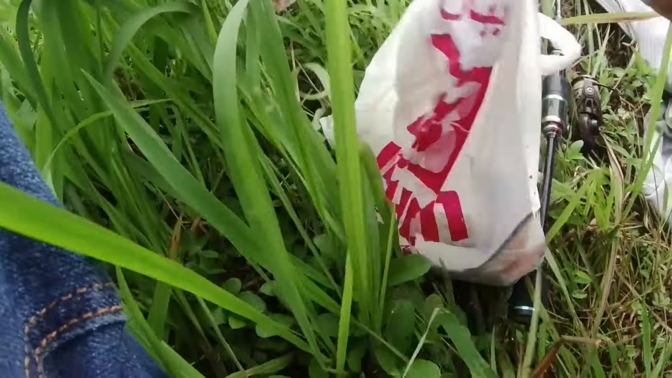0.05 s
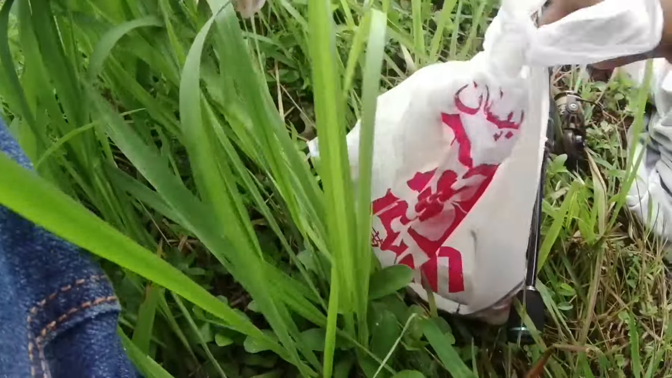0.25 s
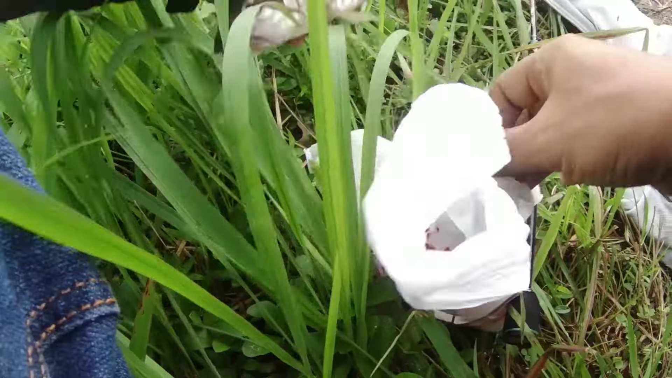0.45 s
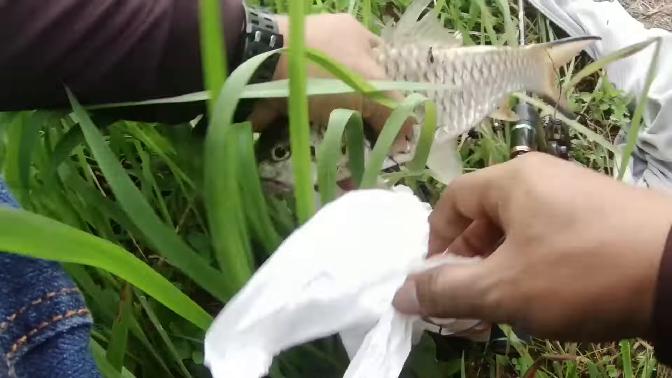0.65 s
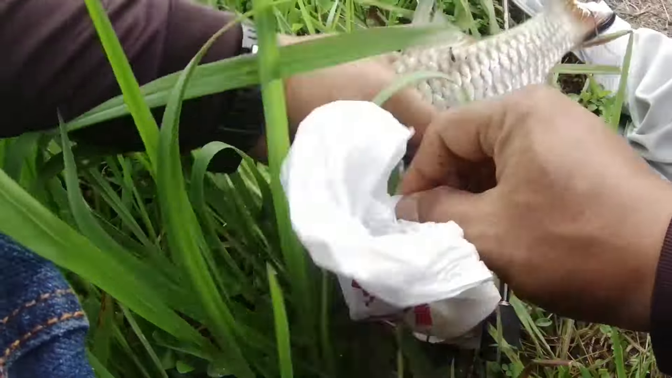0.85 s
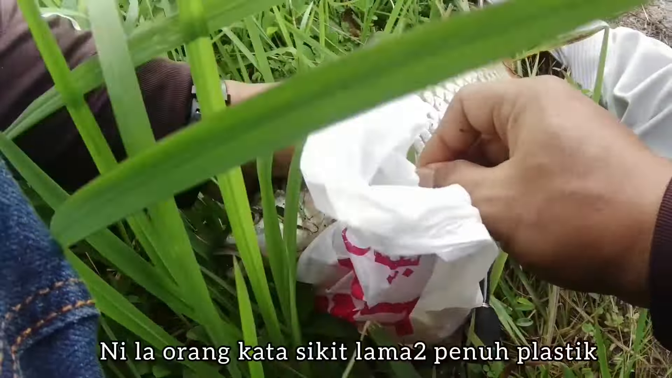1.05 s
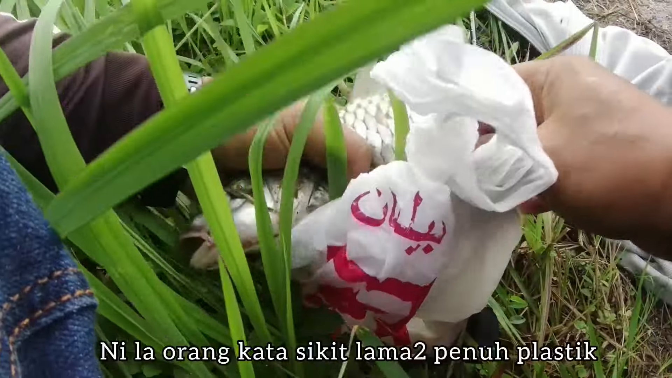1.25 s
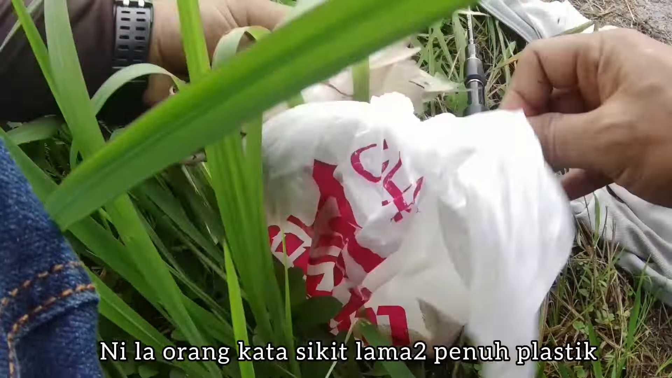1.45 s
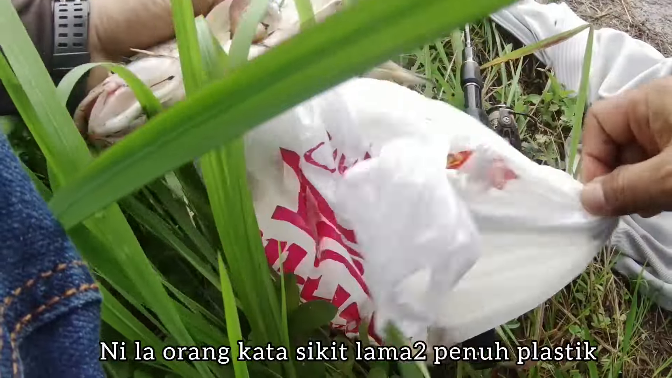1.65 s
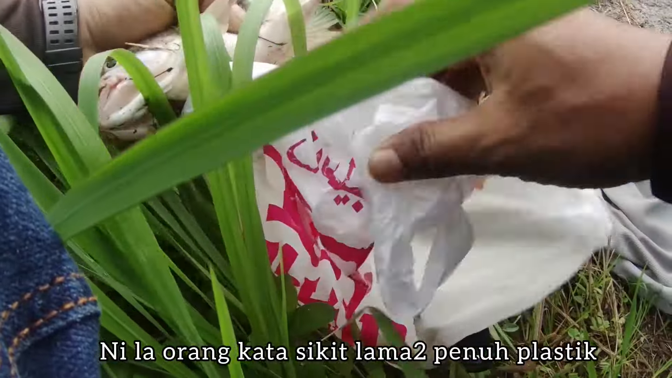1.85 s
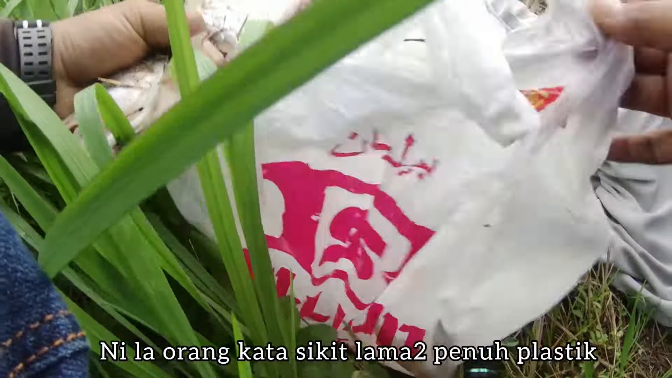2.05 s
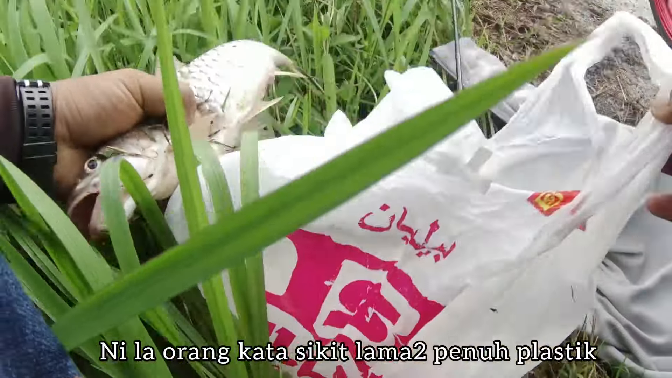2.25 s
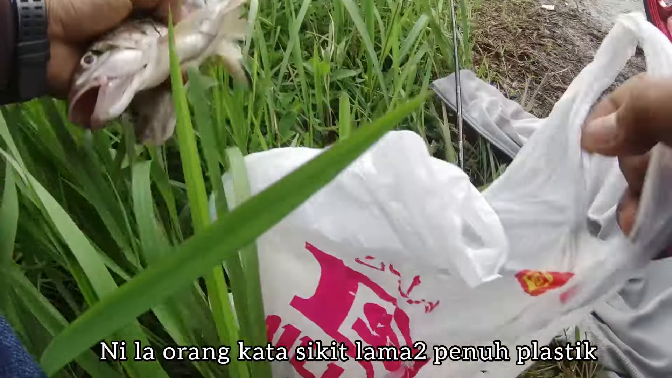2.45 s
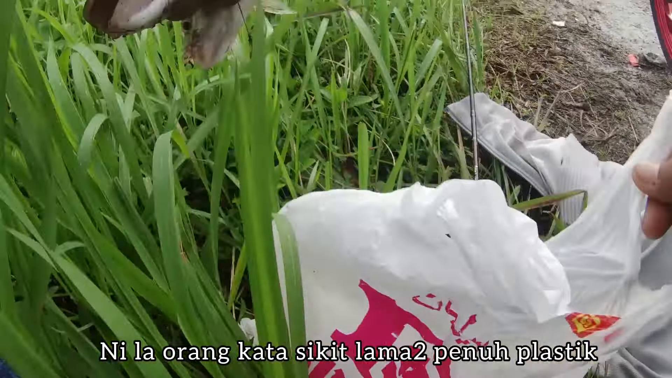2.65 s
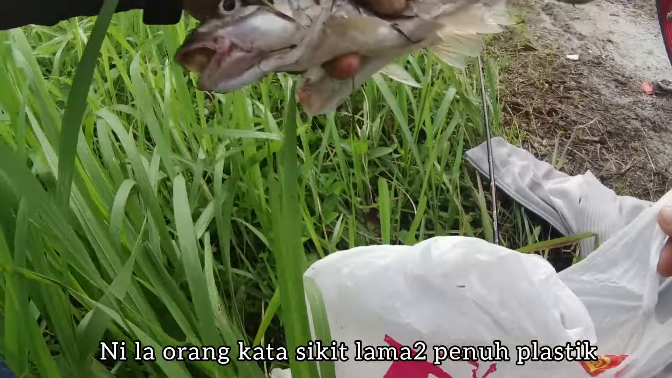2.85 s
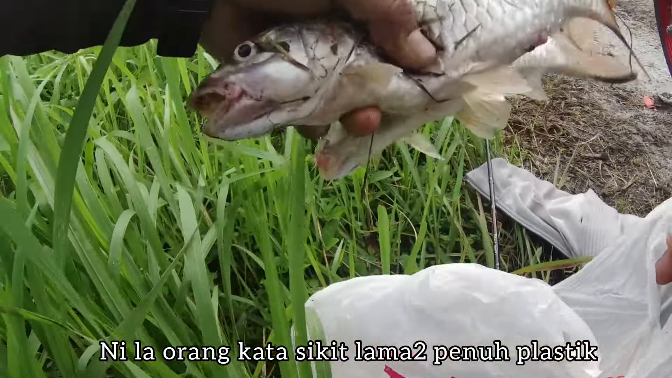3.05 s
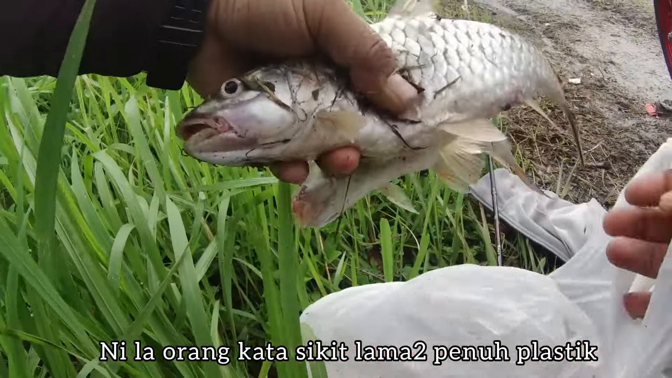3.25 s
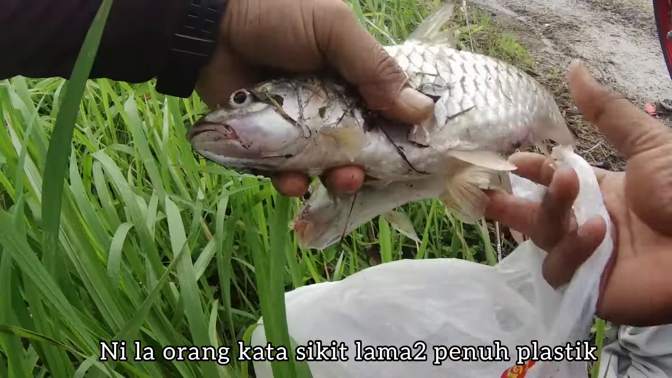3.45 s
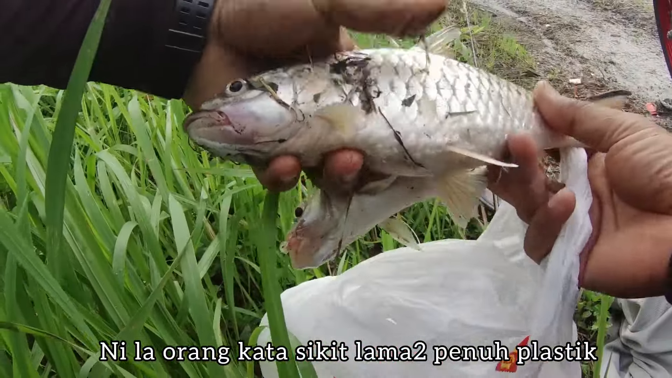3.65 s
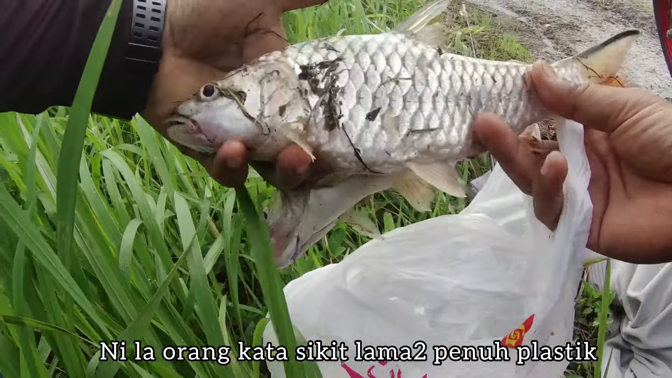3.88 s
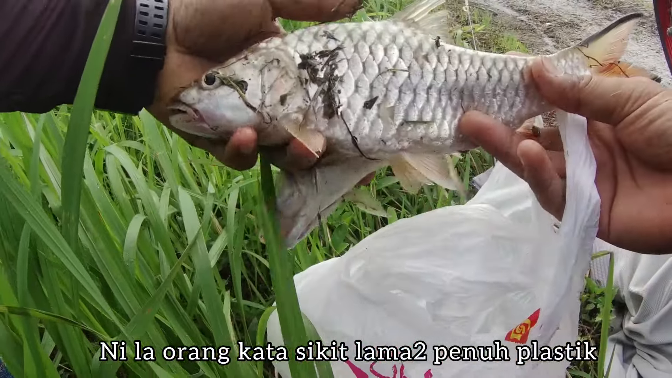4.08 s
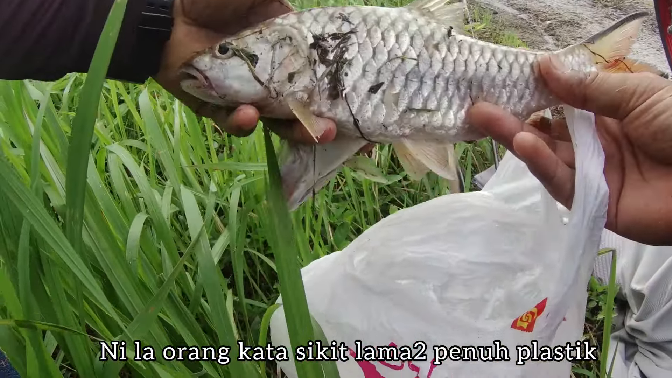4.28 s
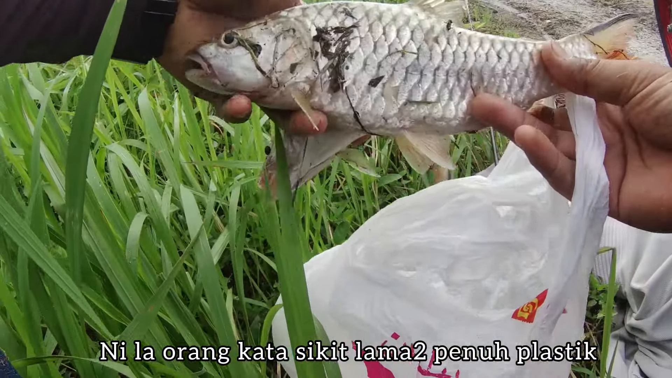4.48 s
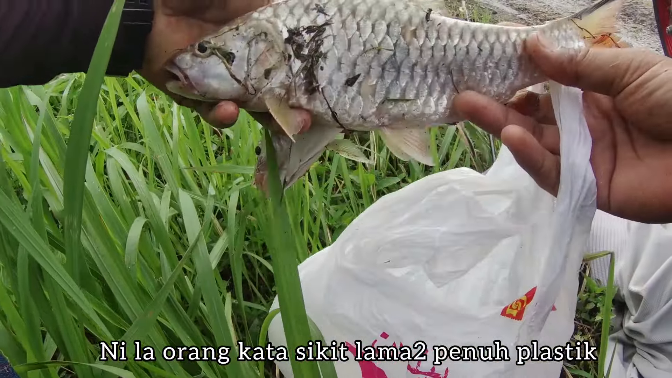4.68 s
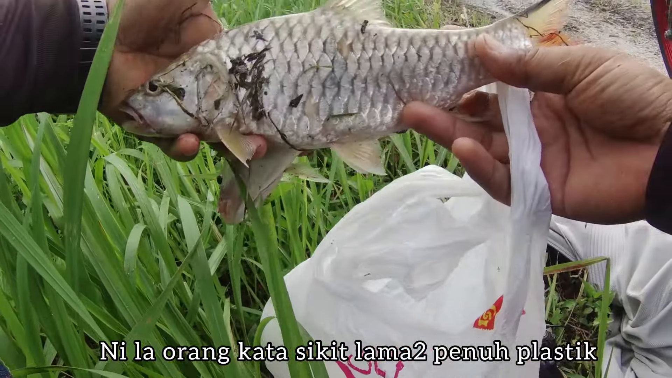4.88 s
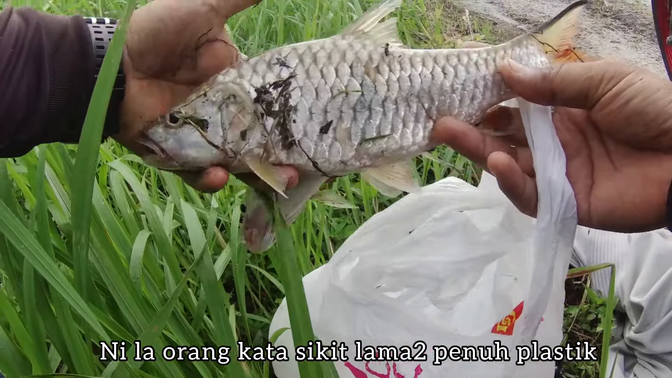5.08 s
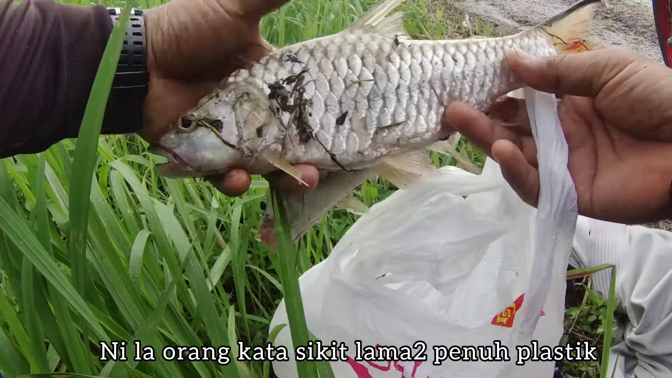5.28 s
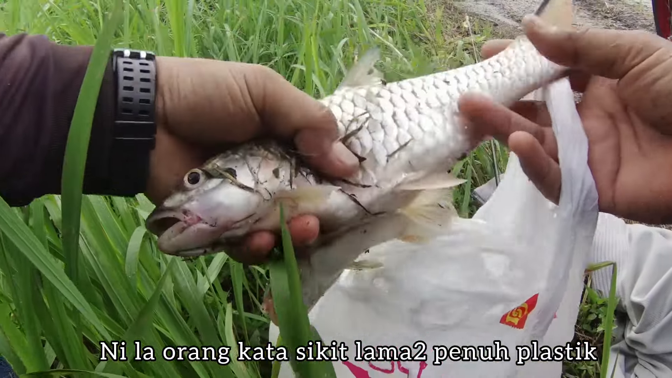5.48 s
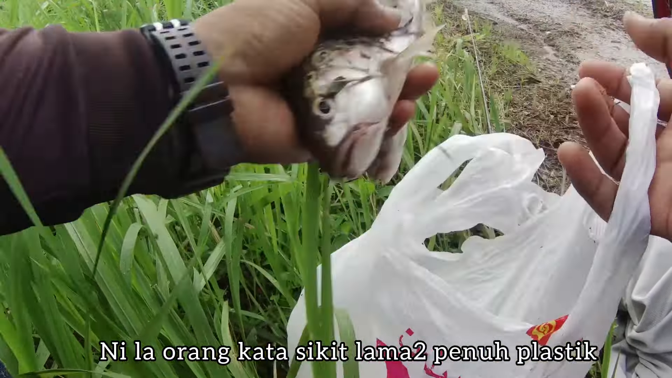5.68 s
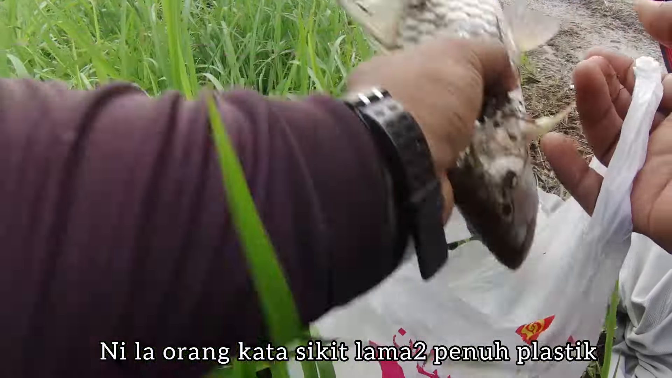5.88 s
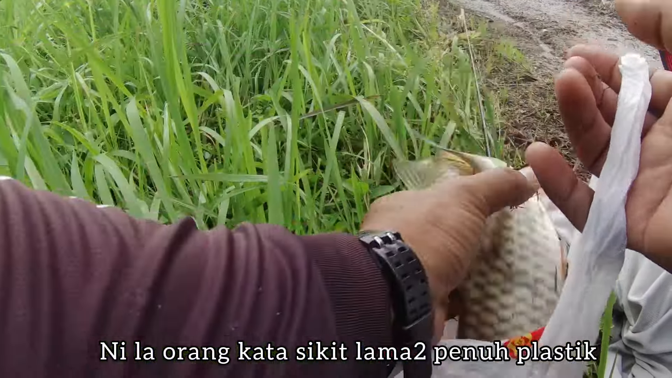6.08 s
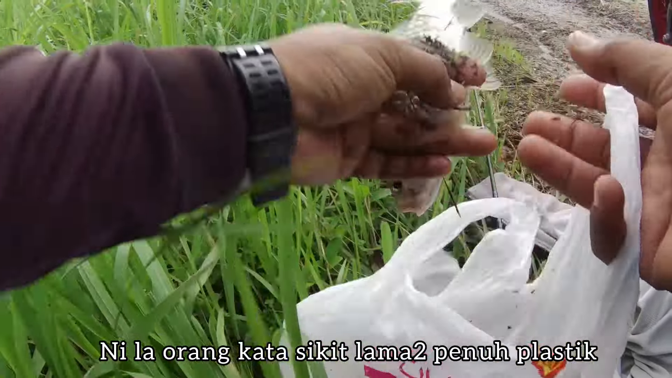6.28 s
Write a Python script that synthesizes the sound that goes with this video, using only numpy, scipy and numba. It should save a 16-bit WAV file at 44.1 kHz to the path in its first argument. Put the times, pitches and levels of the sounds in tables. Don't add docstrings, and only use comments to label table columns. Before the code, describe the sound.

Close, bright plastic bag rustling for three seconds, then small crinkles and ticks over swelling tyre roar, a sinking hum and tiny dry squeaks.

```python
import sys
import numpy as np
from scipy import signal
from scipy.fft import rfft, irfft, next_fast_len
from scipy.io import wavfile
from scipy.ndimage import uniform_filter1d
from numba import njit

SR = 44100
rng = np.random.default_rng(int(sys.argv[2]) if len(sys.argv) > 2 else 0)


def store_pcm(level_fs):
    pcm = np.round(np.clip(level_fs, -1, 1) * 32767).astype(np.int16)
    wavfile.write(sys.argv[1], SR, np.atleast_2d(pcm).T)


def to_linear_factor(level_db):
    exponent = np.asarray(level_db, float) / 20
    return 10 ** exponent


N = 279108
SIZE = next_fast_len(N)


def curves(table):
    s, *columns = np.transpose(table)
    return [np.interp(np.arange(N) / SR, s, c) for c in columns]


def fade_ends(table, fade):
    t = np.arange(N) / SR
    since_start, until_end = t - table[0][0], table[-1][0] - t
    return np.clip(np.minimum(since_start, until_end) / fade + 1, 0, 1)


def unit(x):
    return x / np.sqrt(np.mean(x ** 2))


def colour(x, spectrum):
    hz, db = np.transpose(spectrum)
    f = np.arange(SIZE // 2 + 1) * SR / SIZE + 1
    gain = to_linear_factor(np.interp(np.log(f), np.log(hz), db))
    return irfft(rfft(x, SIZE) * gain, SIZE)[:N]


@njit
def resonance(x, hz, width):
    y, b, l = np.empty(len(x)), 0., 0.
    for i in range(len(x)):
        g, k = np.tan(np.pi * hz[i] / SR), width / hz[i]
        v = (b + g * (x[i] - l)) / (1 + g * (g + k))
        b, l, y[i] = 2 * v - b, l + 2 * g * v, k * v
    return y


def band(hz, width, order=2):
    x = rng.standard_normal(N)
    centre = np.clip(hz + np.zeros(N), 20, .45 * SR)
    for _ in range(order):
        x = resonance(x, centre, 1. * width)
    return unit(x)


def walk(rate):
    hold = max(int(SR / rate), 101)
    steps = np.repeat(rng.standard_normal(N // 100), hold)[:N]
    return 1.291 * uniform_filter1d(uniform_filter1d(steps, hold), hold)


def clicks(rate, spread_db):
    chance, size, sign = rng.random(N), rng.exponential(size=N), rng.standard_normal(N)
    height = to_linear_factor(spread_db * np.minimum(size, 4.2)) * np.sign(sign)
    return unit((chance < rate / SR) * height / np.sqrt(rate))


def ring(x, t60):
    t = np.arange(512) / SR
    tail = rng.standard_normal(len(t)) * np.exp(-np.log(1000) * t / t60)
    tail[0] += 2.5
    smear = rfft(tail, SIZE)
    return rfft(x, SIZE) * smear / np.abs(smear)


def window(hz, octaves):
    place = np.log2((np.arange(SIZE // 2 + 1) * SR / SIZE + 1) / hz) / octaves
    return np.cos(np.pi / 2 * np.clip(place, -1, 1))


def grip():
    # hardest pull t/s, rustle level/dB, 20 dB swell/s, 20 dB fade/s, fine wrinkles/dB
    grips = [(0.085, -29, .16, .13, -1), (0.2, -40, .15, .2, 1), (0.33, -41, .15, .14, 1),
             (0.42, -45, .1, .06, 1), (0.511, -41, .07, .1, 3), (0.62, -28, 0.145, .12, -3),
             (0.78, -32.5, .18, .14, 1), (0.89, -42, .1, .15, 3), (0.985, -44, .12, .05, -2),
             (1.143, -38.5, 0.0615, .16, -1), (1.33, -46, .1, .2, 2), (1.46, -39.5, .2, .16, -1),
             (1.68, -41.5, .3, .27, 2), (1.94, -39, .13, .3, -1), (2.221, -34, .35, .25, 1),
             (2.33, -35, .15, .15, 1), (2.429, -27, .13, .1, -1), (2.51, -41, .08, .08, 2),
             (2.64, -30, .045, .07, -1), (2.73, -29, .08, .22, 1), (2.85, -28, 0.1733, .12, -2),
             (3.11, -36.5, 0.19, .17, 0.1), (3.29, -42, .2, .07, -3)]
    # hardest t/s, rustle level/dB, swell/s, fade/s, fine wrinkles/dB
    nudges = [(3.42, -53.5, .15, .3, -5), (3.67, -61, .2, .2, -2), (3.75, -45, .04, .08, -16),
              (3.83, -55, .08, .14, -2), (3.93, -47, .13, .13, -5), (4.05, -51, .025, .15, 1),
              (4.13, -52, .1, .12, 0.1), (4.21, -49, .12, .1, -1), (4.31, -58, .12, .14, -4),
              (4.52, -61, .12, .2, -2), (4.63, -60, .15, .15, -1), (4.725, -52, .06, .05, -3),
              (4.95, -66, .15, .15, -2), (5.08, -60.5, .15, .07, -3), (5.33, -52.5, .12, .2, -1),
              (5.48, -47, .25, .16, -1), (5.56, -53, .1, .06, -3), (5.72, -66, .15, .15, 2),
              (6.14, -57, .1, .1, -1), (6.22, -48, .1, .13, -1), (6.33, -50, .11, .1, 3)]
    t = np.arange(N) / SR
    power, fine = to_linear_factor(-72) ** 2, 0
    for s, db, swell, fade, fine_db in grips + nudges:
        away = np.where(t < s, (s - t) / swell, (t - s) / fade)
        pull = to_linear_factor(db - 20 * np.minimum(away, 4) ** 1.27) ** 2
        power = power + pull
        fine = fine + pull * fine_db
    return 10 * np.log10(power), fine / power


def bag():
    # t/s, large folds level/dB, middling creases level/dB
    folds = [(0.0, -4, -1), (0.3, -3, 0.1), (0.5, -1, 0.1), (0.8, 5, 3), (1.0, -1, 0.1), (1.2, -1, 1),
             (1.65, 4, 2), (1.95, 0.1, -2), (2.35, 3, 1), (2.8, 0.1, 1), (3.25, 6, 3), (3.6, 2, -1),
             (3.93, -1, -7), (4.06, 2, 3), (4.2, -7, -4), (5.15, -6, -3), (5.5, -9, 0.1), (6.33, -10, -6)]
    # f/Hz, level/dB
    film_tone = [(760, -61), (1300, -20.5), (1540, -18.5), (1970, -15.5), (2750, -8.5), (3790, -8.5),
                 (5500, -7.5), (6500, -5), (8600, -4), (11500, -4), (13200, -4.5), (15600, -12.5)]
    rustle_db, top_db = grip()
    large_db, middling_db = curves(folds)
    harder_db = rustle_db + 45
    rate = 2500 * to_linear_factor(.9 * (rustle_db + 39)) + 90
    wide = ring(clicks(rate, spread_db=2.0), t60=0.00246)
    flurry_db = 0.905 * walk(45) + 1.028 * walk(150)
    low_db = large_db - .3 * harder_db
    middle_db = middling_db - .2 * harder_db
    out = 0
    for hz in 1300 * 2 ** np.arange(0, 4.1, .4):
        own = ring(clicks(rate, spread_db=0.5) + 0.446 * rng.standard_normal(N), t60=0.00768)
        shape = window(hz, 2 / 5)
        crackle = irfft(shape ** 2 * wide + 1.236 * shape * own, SIZE)[:N]
        tilt = np.clip(1.53 * np.log2(5200 / hz), 0, 1) * low_db
        tilt = tilt + np.clip(1.2 - 1.5 * np.abs(np.log2(hz / 5700)), 0, 1) * middle_db
        tilt = tilt + np.clip(2 * np.log2(hz / 9500), 0, 1) * top_db
        tilt = tilt + np.clip(np.log2(2900 / hz), 0, .8) * 0.404 * (rustle_db + 32)
        out = out + to_linear_factor(tilt + 1.31 * walk(35) + 1.163 * walk(16)) * crackle
    film = colour(out, film_tone)
    bright_hz = np.clip(10100 * (1 + 0.026 * walk(14)), 5000, 15000)
    film = film + 1.008 * resonance(film, bright_hz, 2284.0)
    return unit(film) * to_linear_factor(rustle_db + flurry_db + 1.0)


def roar():
    # t/s, roar level/dB
    passes = [
        [(0.0, -55), (0.25, -57), (0.44, -66), (0.63, -53), (0.81, -56), (0.95, -68), (1.45, -62), (2.4, -64),
         (2.5, -85)],
        [(0.25, -66), (0.6, -53), (1.0, -57), (1.75, -57), (2.35, -48.5), (2.94, -43), (3.3, -38.5),
         (3.6, -41.5), (3.72, -76)],
        [(3.15, -75), (3.33, -49), (3.6, -44), (3.76, -43), (4.0, -52), (4.11, -61), (4.65, -68), (5.4, -70),
         (5.6, -85)],
        [(3.75, -85), (4.0, -55), (4.2, -59), (4.7, -68), (5.43, -61), (5.76, -55), (5.97, -52), (6.15, -45),
         (6.33, -43)],
    ]
    # low level/dB, middle level/dB, upper level/dB, engine thrum level/dB
    tyres = [
        (-19, -10, -0.5, -24),
        (-5, -1, -35, -28),
        (-1.5, -10, -1, -23),
        (-4, -0.5, -8, -41),
    ]
    power = 0
    for one_pass, tyre in zip(passes, tyres):
        power = power + to_linear_factor(curves(one_pass)[0] + np.array(tyre)[:, None]) ** 2
    return 10 * np.log10(power)


def road():
    # f/Hz, level/dB
    rumble_tone = [(88, -62.5), (150, -30.5), (268, -11.5), (333, -7.5), (383, 0), (415, 0), (507, -2),
                   (570, -6), (740, -24), (1250, -120)]
    # t/s, middle f/Hz, upper f/Hz
    humps = [(0.0, 790, 1080), (0.25, 720, 1200), (0.45, 640, 1070), (0.65, 670, 1030), (1.45, 700, 1120),
             (2.2, 755, 1040), (2.9, 735, 990), (3.33, 630, 990), (3.62, 640, 1000), (3.75, 710, 1085),
             (4.05, 800, 1120), (4.65, 745, 1070), (5.43, 720, 1000), (5.76, 680, 1100), (5.97, 670, 930),
             (6.33, 690, 1020)]
    low_db, middle_db, upper_db, _ = roar()
    middle_hz, upper_hz = curves(humps)
    swell_db = .7 * walk(14)
    low = unit(colour(rng.standard_normal(N), rumble_tone)) * to_linear_factor(low_db + 1.74 * walk(15))
    middle = band(middle_hz, 340, order=4) * to_linear_factor(middle_db + 1.6 * walk(15))
    upper = band(upper_hz, 540, order=4) * to_linear_factor(upper_db + 0.82 * walk(21.004))
    return (low + middle + upper) * to_linear_factor(swell_db)


def traffic():
    # t/s, tyre hiss level/dB
    far_hiss = [(0.0, -59.5), (0.3, -70), (0.5, -82), (0.7, -66), (0.9, -78), (1.46, -80), (1.75, -72),
                (2.42, -60), (2.55, -66), (3.0, -63), (3.13, -53), (3.28, -54), (3.45, -64), (3.74, -65),
                (3.98, -61), (4.1, -67), (5.9, -69), (6.33, -74)]
    # f/Hz, rms level/dB
    pump = [(75.4, -90)]
    engine_db, hiss_db = roar()[-1], curves(far_hiss)[0]
    t = np.arange(N) / SR
    hum = sum(np.sqrt(2) * to_linear_factor(db) * np.sin(2 * np.pi * hz * t) for hz, db in pump)
    hiss = band(1640, 855, order=3) + 0.57 * band(2232, 815, order=3)
    thrum = band(171.8, 273) * np.hypot(to_linear_factor(engine_db), to_linear_factor(-85))
    return thrum + hiss * to_linear_factor(hiss_db + 0.55 * walk(10)) + hum


def field():
    # f/Hz, level/dB
    field_tone = [(15, -60), (25, -27.5), (148, 0), (744, 11), (1310, -45), (1760, -61.5), (2640, 2.5),
                  (3270, 0.5), (7140, -4.5), (10700, -5.5), (15600, -75.5)]
    return unit(colour(rng.standard_normal(N), field_tone)) * to_linear_factor(-69 + 0.22 * walk(2.5))


def snaps():
    # t/s, peak level/dB, centre f/Hz
    creases = [(3.3123, -37.5, 9310), (3.3622, -31.5, 9680), (3.5842, -41, 10300), (3.678, -39, 7210),
               (3.7347, -30, 10090), (3.8103, -36, 9400), (3.9199, -34, 9480), (3.9865, -34, 9090),
               (4.0474, -28, 9400), (4.106, -29.5, 9530), (4.1337, -29, 10100), (4.1549, -36.5, 8960),
               (4.1986, -37.5, 11500), (4.3255, -35, 10780), (4.503, -38, 11200), (4.5305, -36.5, 8760),
               (4.5679, -35, 11800), (4.647, -38, 11100), (4.929, -40, 7700), (4.993, -47, 10100),
               (5.038, -35, 7600), (5.0728, -44, 6510), (5.3123, -34.5, 7950), (5.362, -33, 10000),
               (5.4056, -31, 11000), (5.4474, -33, 9340), (6.1275, -41.5, 10500), (6.2063, -28, 10400),
               (6.222, -23.5, 10430), (6.283, -33.5, 10700)]
    out, t = np.zeros(N), np.arange(256) / SR
    grits = rng.standard_normal((len(creases), len(t)))
    shape = (t / .0004) * np.exp(-t / 0.00059)
    for (s, db, hz), grit in zip(creases, grits):
        centre = hz + 0 * t
        tick = resonance(resonance(grit, centre, 7700.0), centre, 7700.0) * shape
        i = int(s * SR)
        out[i:i + len(t)] += (to_linear_factor(db - 5.0) * tick / np.abs(tick).max())[:N - i]
    return out


def whine():
    # t/s, pitch f/Hz, level/dB
    tread = [
        (3.42, 389.1, -45.5),
        (3.492, 391.1, -56.5),
        (3.512, 405, -40),
        (3.558, 379.3, -44),
        (3.692, 374.9, -34.5),
        (3.772, 370.8, -45),
        (3.856, 358.5, -43.5),
        (4.3, 351.9, -75),
    ]
    hz, db = curves(tread)
    phase = 2 * np.pi * np.cumsum(hz * (1 + 0.00635 * walk(24.63))) / SR
    return np.sqrt(2) * np.sin(phase) * to_linear_factor(db + 0.97 * walk(29.94)) * fade_ends(tread, fade=0.084)


def squeaks():
    # start t/s, length/s, pitch f/Hz, level/dB, octave below level/dB
    joint = [
        (3.7, .04, 4140, -58, -70),
        (3.735, .04, 4200, -52, -64),
        (4.155, .03, 3910, -60, -63.5),
        (4.18, .025, 3860, -53, -50),
        (4.208, .065, 3920, -45, -54),
        (4.272, .095, 3943, -58, -74),
        (4.85, .035, 3817, -54, -80.5),
        (4.885, .075, 3810, -62, -83.5),
    ]
    out = 0
    for s, length, hz, db, below_db in joint:
        shape = [(s, -10), (s + .35 * length, 0), (s + length, -15)]  # (s, dB)
        phase = 2 * np.pi * np.cumsum(hz * (1 + 0.00873 * walk(400))) / SR
        slip_db = 4.15 * walk(300) + curves(shape)[0]
        note = to_linear_factor(db) * (np.sin(phase) + to_linear_factor(-9) * np.sin(2 * phase))
        note = note + to_linear_factor(below_db) * np.sin(phase / 2)
        out = out + np.sqrt(2) * note * to_linear_factor(slip_db) * fade_ends(shape, fade=0.0048)
    return out


def brief_humps():
    # start t/s, length/s, centre f/Hz, level/dB
    noise_humps = [(4.8, 0.192, 1660, -63), (5.0, .25, 1652, -70.5), (5.2, .3, 3340, -73),
                   (5.5, .35, 3260, -74), (5.68, .2, 1566, -65), (4.71, .02, 4635, -70),
                   (3.72, .05, 4250, -63), (4.145, .02, 2240, -66), (4.4, 0.188, 1090, -64.5),
                   (6.27, .1, 1150, -54), (5.93, .1, 980, -61), (4.06, .01, 4500, -67),
                   (3.93, .04, 6000, -64)]
    out = 0
    for s, length, hz, db in noise_humps:
        level = to_linear_factor(db + 1.5 * walk(30)) * fade_ends([[s], [s + length]], fade=0.027)
        out = out + band(hz, 120 + .05 * hz) * level
    return out


def scene():
    near = bag() + snaps()
    others = road() + whine() + squeaks() + brief_humps()
    return (near + others + traffic() + field())[None]


def low_pass(x):
    return signal.sosfilt(signal.butter(12, 16810, fs=SR, output="sos"), x)


def record(dry):
    steep = signal.ellip(12, .2, 80, 15720, fs=SR, output="sos")
    return low_pass(signal.sosfilt(steep, dry))


dry = scene()
out = record(dry)
store_pcm(out)
```